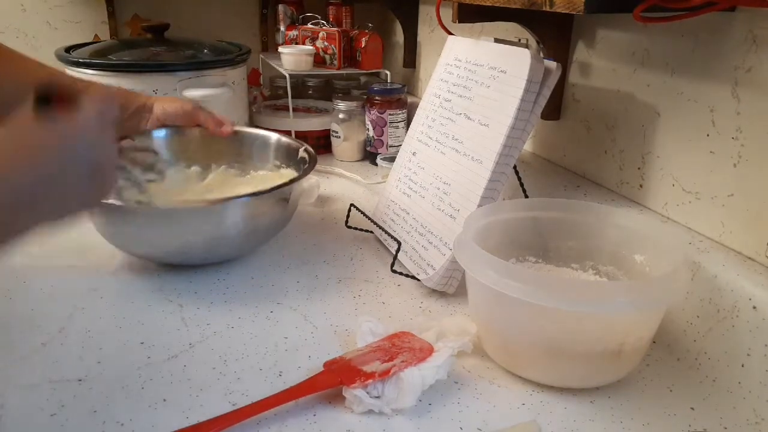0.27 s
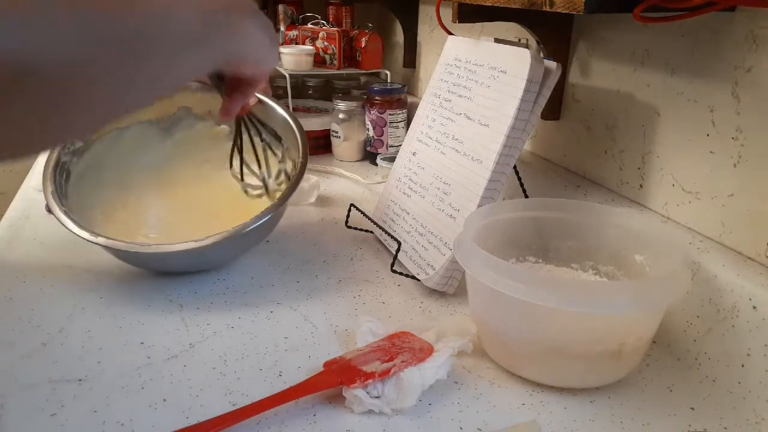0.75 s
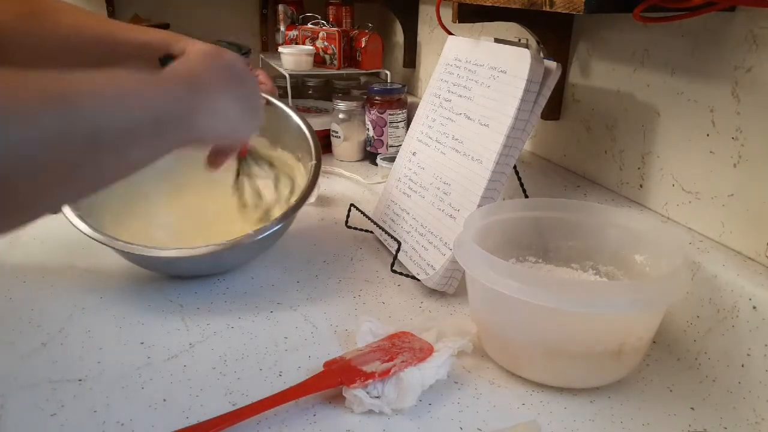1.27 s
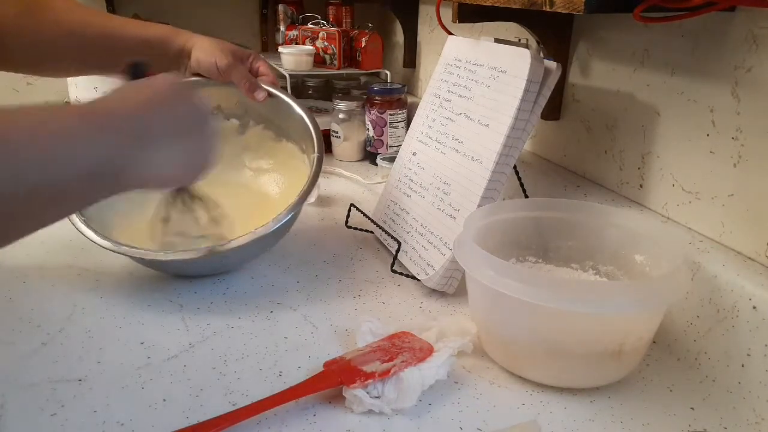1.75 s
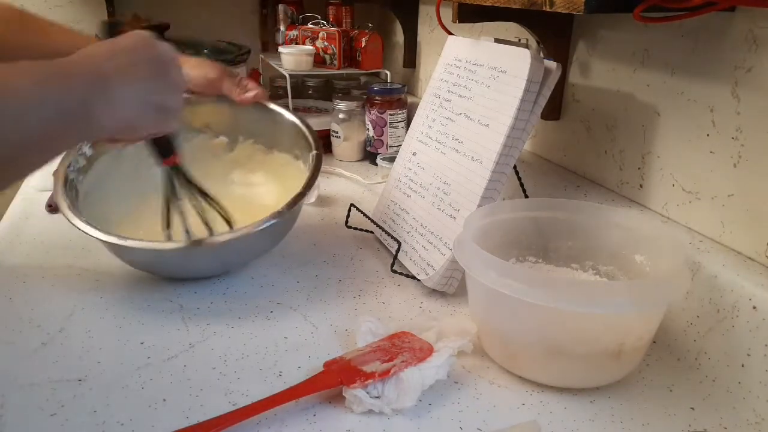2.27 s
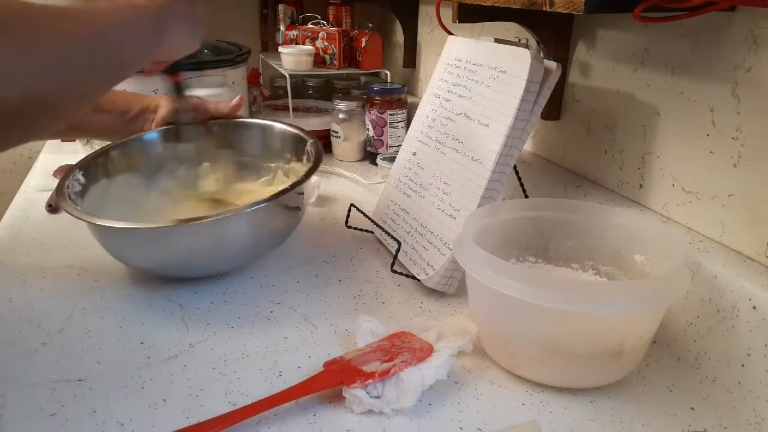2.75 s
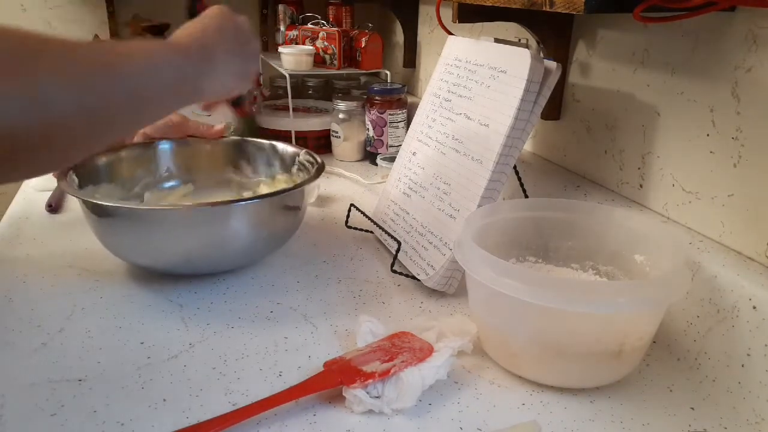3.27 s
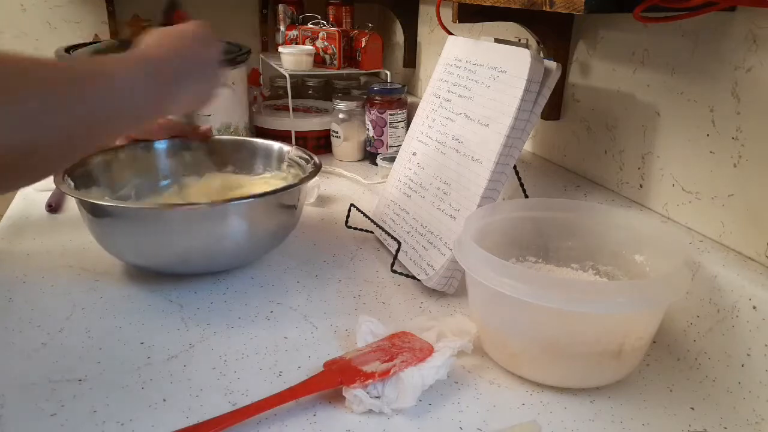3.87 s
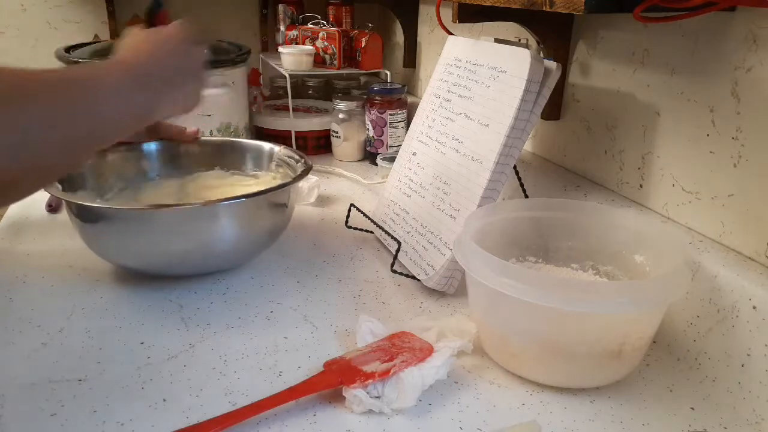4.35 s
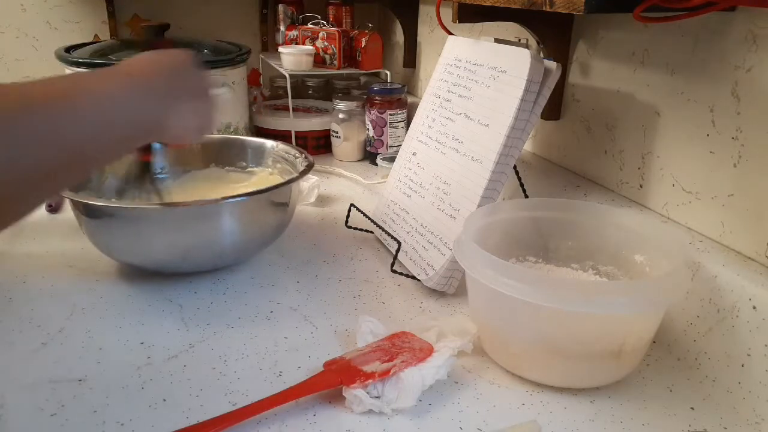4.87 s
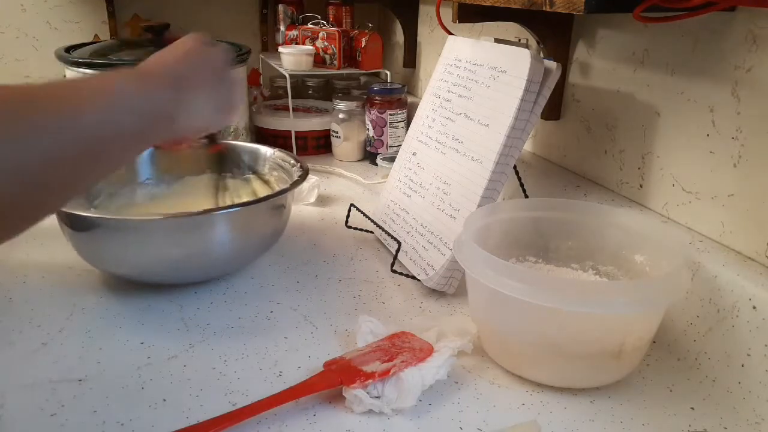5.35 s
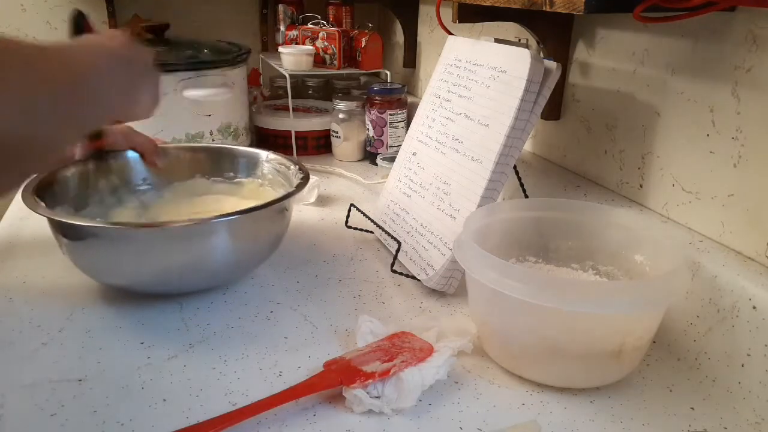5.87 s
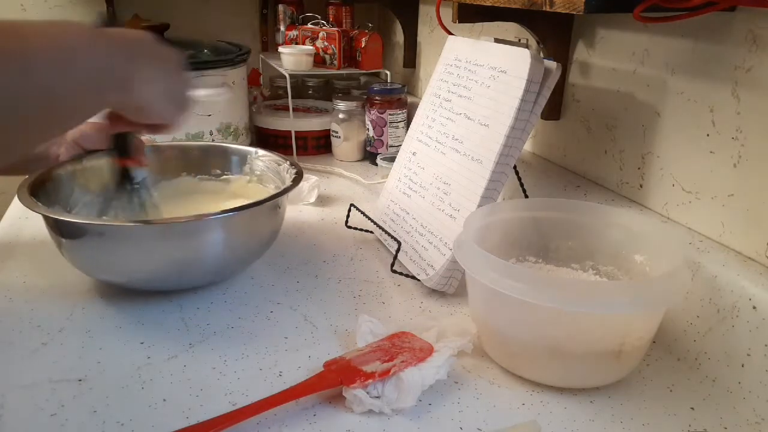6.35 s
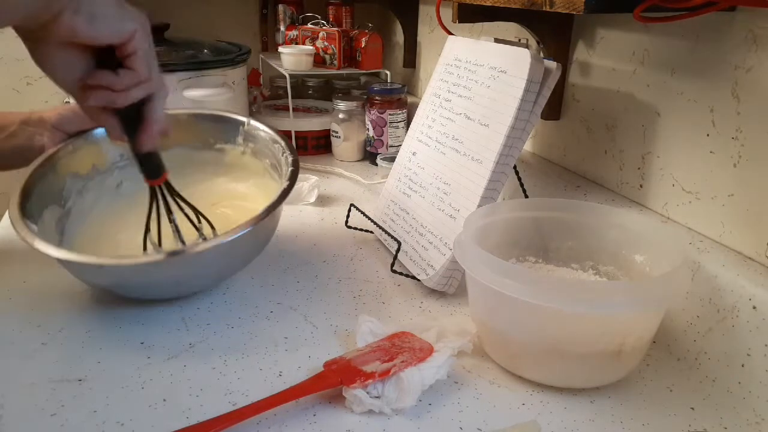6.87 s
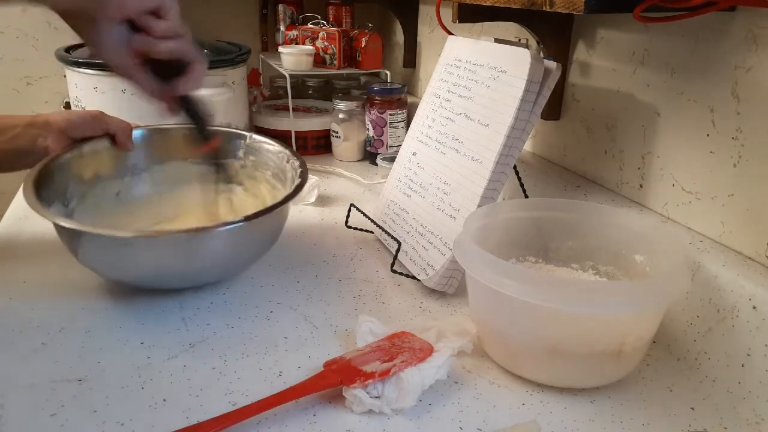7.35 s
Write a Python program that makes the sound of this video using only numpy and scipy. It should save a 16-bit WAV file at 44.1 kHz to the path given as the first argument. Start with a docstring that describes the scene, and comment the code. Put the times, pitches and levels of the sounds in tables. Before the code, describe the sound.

Quick metallic whisking in a steel mixing bowl, bright scrapes and wet batter squelches, the bowl later rocking and thudding against a hollow kitchen counter.

```python
"""A wire whisk beats batter in a steel bowl on a kitchen counter, over quiet room air and an appliance's faint whine.
At first the bowl is tipped up in one hand and rings: random slips scrape the wires, and dying sines make the ring.
Foam and batter are random pops, filtered. Later the bowl is set down flat: it sounds duller and rocks, its foot
knocking and rubbing on the hollow counter. Wet gliding sweeps of noise come from the middle on, among the knocks.
Near the end a very short, high tone burst swells and fades."""
import sys
import numpy as np
from scipy import signal
from scipy.fft import rfft, irfft
from scipy.io import wavfile
from scipy.ndimage import uniform_filter1d

SR = 44100
rng = np.random.default_rng(int(sys.argv[2]) if len(sys.argv) > 2 else 0)


def unload_audio(sound):
    """Save the sound as a 16-bit wav file, at the path given as the first command line argument."""
    columns = np.transpose(np.atleast_2d(sound))
    # keep every value between -1 and 1, then stretch to whole-number steps
    steps = np.round(np.clip(columns, -1, 1) * 32767)
    wavfile.write(sys.argv[1], SR, steps.astype(np.int16))


N = 335601  # length in samples

# How freely the bowl rings, high while tipped up. Each row: time in seconds, freedom in dB.
RING_FREEDOM = [(0, 8), (.8, 7), (1.3, 4), (2.45, 3), (2.9, -5), (4.5, -15), (6.3, -3.5), (6.8, -9.5),
                (7.6, -24.5)]
# Ringing modes of the steel bowl with batter in it; the first six are the deep ones.
# Each row: pitch in Hz, relative level in dB, time in seconds to fall by 60 dB when nothing damps it.
BOWL_MODES = [(450, -17, 0.5), (490, -19.5, 0.43), (618.8, 0.5, 0.13), (633.6, -10, 0.44),
              (740, -14, 0.053), (906, -16, 0.11), (1320, -0.5, 0.26), (1400, -1, 0.33), (1510, 15, 0.053),
              (1600, 11.5, 0.12), (1795, 1, 0.11), (1850, 8, 0.07), (1930, 6.5, 0.046), (2018, 14.5, 0.067),
              (2210, 12.5, 0.066), (2394, 2, 0.066), (2610, 11, 0.21), (3050, 0, 0.11), (3390, -12, .04),
              (4200, -14, .03), (5290, -20, 0.038)]
# Modes of the hollow counter under the loaded bowl; the first is the deep boom.
# Each row: pitch in Hz, relative level in dB, time in seconds to fall by 60 dB.
COUNTER_MODES = [(59.6, -10.5, 0.4), (118.4, -1, 0.26), (141, 5, 0.11), (162.5, -3.5, 0.15),
                 (178.6, 8.5, 0.041), (195.6, -4.5, 0.29), (233, -1, 0.16), (274, -2.5, 0.17),
                 (303, -8.5, 0.17), (366, -3.5, 0.13)]

TURNS_PER_S = 2.9  # average pace of the whisk round the bowl


def from_db(db):
    """Turn decibels into gain."""
    return 10 ** (np.asarray(db) / 20)


def rms_one(x):
    """Scale a sound to an average (rms) level of 1."""
    return x / np.sqrt(np.mean(x ** 2) + 1e-20)


def energy_one(x):
    """Scale each row to a total energy of 1."""
    return x / np.sqrt(np.sum(x ** 2, axis=-1, keepdims=True) + 1e-20)


def fade(t, t60_s):
    """Natural dying away: down by 60 dB after t60_s seconds."""
    return np.exp(-np.log(1000) * t / t60_s)


def in_time(rows):
    """Draw a curve through (seconds, value) rows, one value for every sample."""
    s, value = np.transpose(rows)
    return np.interp(np.arange(N) / SR, s, value)


def add(track, s, sound):
    """Mix a sound into a track at time s."""
    at = int(np.clip(round(s * SR), 0, N - 1))
    track[at:at + len(sound)] += sound[:N - at]


def drift(rate):
    """Slow, smooth random wandering with a spread of 1; a higher rate in Hz wanders faster."""
    step, settle = 40, 2000  # one value per 40 samples; the first 2000 values are thrown away
    r = np.exp(-2 * np.pi * rate * step / SR)
    noise = rng.standard_normal(N // step + settle + 2)
    slow = signal.lfilter([1], [1, -2 * r, r * r], noise)[settle:]
    return np.interp(np.arange(N) / step, np.arange(len(slow)), rms_one(slow))


def through(x, response):
    """Pass a sound through a body or space, given its answer to a single click."""
    return signal.fftconvolve(x, response)[:N]


def resonate(x, hz, r):
    """Ring at one pitch; the closer r is to 1, the longer and narrower the ring."""
    return signal.lfilter([1, 0, -1], [1, -2 * r * np.cos(2 * np.pi * hz / SR), r * r], x)


def colour(x, spectrum, size=4096):
    """Shape the tone by (Hz, dB) rows with a filter of energy 1 that responds at once (minimum phase)."""
    hz, db = np.transpose(spectrum)
    grid = np.arange(size // 2 + 1) * SR / size + 1
    cepstrum = irfft(np.log(from_db(np.interp(np.log(grid), np.log(hz), db))))
    # folding the second half onto the first puts the response after the click
    cepstrum[1:size // 2] *= 2
    cepstrum[size // 2 + 1:] = 0
    return through(x, energy_one(irfft(np.exp(rfft(cepstrum)))))


def blows(modes, vary_db, count, size=18000, lift_db=0):
    """Blows on a body, one per row: a sum of dying sines, with the modes' strengths varied by chance."""
    hz, db, t60_s = np.transpose(modes)[:, :, None]
    t = np.arange(size) / SR
    luck_db = np.clip(vary_db * rng.standard_normal((count, len(modes))), -10, 5)
    rings = np.sin(2 * np.pi * hz * t) * fade(t, t60_s)
    return from_db(db.T + luck_db + lift_db) @ rings


def grains(per_s, spread_db, clump_db, clump_rate):
    """Random clicks of uneven size that come in clumps; rms 1."""
    sizes = from_db(spread_db * np.minimum(rng.exponential(1, N), 4)) * rng.choice([-1, 1], N)
    happens = rng.random(N) < per_s / SR
    return rms_one(sizes * happens * from_db(clump_db * drift(clump_rate)))


def rattle(length_s, first, size=4000):
    """One wire or edge lands, random clicks follow and die away; energy 1."""
    t = np.arange(size) / SR
    happens = rng.random(size) < .15
    clicks = energy_one(rng.standard_normal(size) * happens * np.exp(-t / max(length_s, .0005)))
    clicks[0] += first
    return energy_one(clicks)


def swells(rows, attack_s, sag_db_per_s, release_s):
    """Gain of (start s, length s, dB) pushes: each rises, sags (grows if the sag is negative), then fades."""
    power, t = np.zeros(N), np.arange(2 * SR) / SR
    for s, length_s, db in rows:
        rise = 1 - np.exp(-t / attack_s)
        release = np.exp(-np.maximum(t - length_s, 0) / release_s)
        add(power, s, (from_db(db - sag_db_per_s * t) * rise * release) ** 2)
    return np.sqrt(power + 1e-18)


def places(x, turns_per_s, count):
    """Share a sound among places round the bowl as the whisk circles unevenly; total power is kept."""
    turn = count * (turns_per_s * np.arange(N) / SR + 0.2256 * drift(1.225))
    away = np.abs((turn - np.arange(count)[:, None]) % count - count / 2)
    return x * np.cos(np.pi / 2 * np.minimum(away, 1))


def kitchen(x, near_db, room_db, pan_db, size=14000):
    """Direct sound reaches the left microphone first; bowl, counter and wall scatter it, then the room dies away."""
    near_t60_s, room_t60_s, mic_lag_s = 0.038, 0.29, .00016
    t = np.arange(size) / SR
    echoes = rng.standard_normal((2, size)) * (rng.random((2, size)) < .15)
    near = energy_one(echoes * (t > .0006) * fade(t, near_t60_s))
    room = energy_one(rng.standard_normal((2, size)) * (t > .007) * fade(t, room_t60_s))
    no_bass = signal.butter(2, 450, "high", fs=SR, output="sos")
    scatter = signal.sosfilt(no_bass, from_db(near_db) * near + from_db(room_db) * room)
    # the direct sound
    scatter[0, 0] += 1
    scatter[1, round(mic_lag_s * SR)] += 1
    sides = np.array([through(x, side) for side in energy_one(scatter)])
    return sides * from_db([[pan_db / 2], [-pan_db / 2]])


def background(noise_db):
    """Quiet room air is filtered noise; an appliance adds sines whose phase wavers slightly."""
    # Tone of the room air. Each row: frequency in Hz, relative level in dB.
    air_spectrum = [(18, -12), (30, -26.5), (130, 0), (320, -22), (424, -4), (470, -13.5), (1570, -19.5),
                    (1880, -24), (2140, -27.5), (2630, -17.5), (3070, -29), (12600, -37), (14000, -23)]
    # Appliance tones. Each row: pitch in Hz, rms level in dB ahead of the recorder.
    hum_tones = [(59.5, -73), (415, -81.5), (1394, -88)]
    air = np.array([colour(rng.standard_normal(N), air_spectrum) for side in range(2)])
    t = np.arange(N) / SR
    tones = np.zeros(N)
    for hz, db in hum_tones:
        tones += from_db(db) * np.sqrt(2) * np.sin(2 * np.pi * hz * t + 0.41 * drift(6.3))
    # each side hears a little of the other side's air
    return from_db(noise_db) * (air + 0.12 * air[::-1]) + tones


def whine():
    """The appliance's high whine: a steady tone inside a narrow, fluttering band of noise."""
    # Strength of the whine. Each row: time in seconds, level in dB ahead of the recorder.
    whine_level = [(0, -74.5), (.8, -77.5), (7, -80.5)]
    centre_hz, width_hz = 2560, 150
    edges_hz = [centre_hz - width_hz / 2, centre_hz + width_hz / 2]
    band = signal.butter(2, edges_hz, "band", fs=SR, output="sos")
    flutter = rms_one(signal.sosfilt(band, rng.standard_normal((2, N))))
    tone = np.sin(2 * np.pi * centre_hz * np.arange(N) / SR)
    return from_db(in_time(whine_level)) * rms_one(.5 * flutter + tone)


def effort(wet_share):
    """Gain of the whisk's strokes: each bites at once, eases off as the wrist turns, and fades."""
    # Pushes round the bowl, about two a turn. Each row: start in seconds, length in seconds,
    # level in dB ahead of the layer's own gain, wetness in dB (wet_share of it is added to the level).
    strokes = [(0.064, 0.27, -86, -13), (0.579, 0.11, -66.5, -3), (0.857, 0.13, -53, -24),
               (1.01, 0.31, -58, -18), (1.389, 0.13, -52, -19), (1.527, 0.31, -60, -9),
               (1.648, 0.39, -54, -21), (1.898, 0.067, -45.5, -43), (2.049, 0.043, -50.5, -9.5),
               (2.221, 0.065, -55, -7.5), (2.33, 0.1, -50, -39), (2.465, 0.042, -56, -24),
               (2.621, 0.037, -50.5, -4), (2.665, 0.19, -59, -5), (2.889, 0.11, -54, -1),
               (3.055, 0.34, -57.5, 0.5), (3.252, 0.2, -48.5, -30), (3.46, 0.25, -59, -3.5),
               (3.726, 0.17, -51, 1.5), (3.939, 0.22, -53.5, -1), (4.172, 0.29, -53.5, 2.5),
               (4.47, 0.28, -50.5, -3.5), (4.765, 0.18, -55.5, 0), (4.973, 0.13, -49.5, -7.5),
               (5.064, 0.096, -49.5, 2.5), (5.175, 0.21, -55, -2.5), (5.401, 0.17, -52, -4),
               (5.567, 0.17, -61.5, -3), (5.694, 0.064, -59.5, -3), (5.757, 0.083, -49, -6),
               (5.876, 0.035, -53.5, -7), (5.959, 0.17, -56, -5), (6.114, 0.093, -50.5, -2),
               (6.262, 0.071, -56, -2.5), (6.352, 0.07, -52, 1.5), (6.461, 0.082, -48.5, -11.5),
               (6.507, 0.056, -51, 0.5), (6.56, 0.043, -51.5, 3.5), (6.632, 0.14, -54, -3.5),
               (6.835, 0.061, -58, -6.5), (6.934, 0.13, -75.5, -6), (7.139, 0.073, -73, -4),
               (7.27, 0.1, -66.5, -9), (7.417, 0.22, -67, -11), (7.514, 0.13, -62, 3)]
    rows = [(s, length_s, db + wet_share * wet_db) for s, length_s, db, wet_db in strokes]
    return swells(rows, attack_s=0.0046, sag_db_per_s=12, release_s=0.02)


def wires(ring_db, count, order=22, size=3000):
    """Whisk responses, one per row: bare contact plus the loops' short ring, at other pitches in each; energy 1."""
    low_hz, high_hz, t60_s = 2568, 12085, 0.032
    t = np.arange(size) / SR
    hz = low_hz * (high_hz / low_hz) ** rng.random((count, order, 1))
    loops = np.sin(2 * np.pi * hz * t).sum(axis=1) * fade(t, t60_s)
    response = from_db(ring_db) * energy_one(loops)
    response[:, 0] += 1
    return energy_one(response)


def scratches(per_s, slip_hz, length_s, spread_db, count=900, size=1500):
    """Single wires judder over the steel: short, uneven runs of slips, each at a rate of its own; rms 1."""
    out, t = np.zeros(N), np.arange(size) / SR
    wait, speed, reach, force = rng.random((count, 4)).T
    rate_hz = slip_hz * 4 ** (speed[:, None] - .5)
    # a wire slips each time its uneven progress passes a whole number
    progress = np.cumsum(rate_hz * rng.exponential(1, (count, size)) ** 2 / 2 / SR, axis=1)
    slips = np.diff(np.floor(progress), prepend=-1) * rng.uniform(0.35, 1, (count, size))
    runs = slips * np.exp(-t / (length_s * (.5 + reach[:, None])))
    starts_s = np.cumsum((.5 + wait) / per_s)
    for s, run in zip(starts_s, from_db(spread_db * force[:, None]) * runs):
        if s < N / SR:
            add(out, s, run)
    return rms_one(out)


def scrape(rubbing):
    """Slips ring the wire loops, which change as the whisk presses on other places."""
    # Tone of the scrape. Each row: frequency in Hz, relative level in dB.
    scrape_spectrum = [(300, -21), (1000, -35), (2500, -8), (3500, 6.5), (4500, 6), (5600, 5), (6700, 5),
                       (7600, -1.5), (10000, 3), (14000, -2)]
    pressed = places(rubbing, TURNS_PER_S / 2, count=9)
    ringing = sum(through(x, loop) for x, loop in zip(pressed, wires(ring_db=-1.5, count=9)))
    return from_db(1.5) * colour(ringing, scrape_spectrum)


def foam():
    """Bursting foam is a crackle of very uneven clicks that follows the wetness almost fully."""
    # Tone of the foam. Each row: frequency in Hz, relative level in dB.
    foam_spectrum = [(1000, -66), (4000, -38.5), (6500, -15), (8000, 1), (10000, 0.5), (13000, -7),
                     (15000, 2.5)]
    crackle = grains(per_s=5300, spread_db=15.5, clump_db=2.5, clump_rate=49)
    return from_db(11) * effort(0.97) * colour(crackle, foam_spectrum)


def bubbles(per_s, cycles, spread_db, count=18):
    """Pockets in the batter pop at random pitches and ring for a few cycles; flat spectrum, rms 1."""
    out = np.zeros(N)
    pops = grains(per_s, spread_db, clump_db=3, clump_rate=36.0)
    dealt = rng.integers(0, count, N)  # which pitch each pop gets
    for k, hz in enumerate(np.geomspace(250, 4200, count)):
        r = from_db(-60 * hz / (cycles * SR))  # down by 60 dB after so many cycles
        own_pops = pops * (dealt == k) + 1e-18 * (dealt == 0)  # the tiny part is far too faint to hear
        out += np.sqrt(hz) * rms_one(resonate(own_pops, hz, r))
    return rms_one(out)


def batter():
    """Folding batter squelches as its bubbles pop, more so in wet strokes."""
    # Tone of the batter. Each row: frequency in Hz, relative level in dB.
    batter_spectrum = [(100, -15.5), (270, -16), (380, 4), (480, -2), (630, 3.5), (800, -3.5), (1100, -0.5),
                       (1700, -1.5), (2300, 0), (3200, -5), (6000, -23)]
    squelch = colour(bubbles(per_s=1100, cycles=8.7, spread_db=1.1), batter_spectrum)
    return from_db(6) * effort(0.38) * rms_one(squelch)


def drag(rubbing):
    """The same slips set the whole bowl ringing, louder the more freely it rings."""
    driven = from_db(-6.5 + in_time(RING_FREEDOM)) * rubbing
    bodies = energy_one(blows(BOWL_MODES, vary_db=3.5, count=3))
    return sum(through(x, ring) for x, ring in zip(places(driven, TURNS_PER_S, count=3), bodies))


def sings(waver_hz):
    """A dragging wire makes one mode of the bowl sing: a sine that swells, wavers and rings on."""
    # Each row: start in seconds, length in seconds, average pitch in Hz, level in dB ahead of the room.
    songs = [(0.086, 0.064, 1382, -71), (0.23, 0.066, 1420, -69), (0.558, 0.045, 697, -53),
             (0.594, 0.017, 1863, -45.5), (0.65, .05, 1366, -60), (2.066, 0.039, 1868, -44.5),
             (2.213, 0.052, 2005, -57), (6.52, .03, 3090, -48)]
    waver = waver_hz * drift(23.6)
    out = np.zeros(N)
    for s, length_s, hz, db in songs:
        tone = np.sqrt(2) * np.sin(2 * np.pi * np.cumsum(hz + waver) / SR)
        out += swells([(s, length_s, db)], attack_s=0.008, sag_db_per_s=0, release_s=0.012) * tone
    return out


def taps(push, low_hz, high_hz, count=45):
    """Chance light touches of single wires, levels following the push behind them; rows like hard_strikes."""
    when, spot, loose = rng.random((count, 3)).T
    # one tap at a random moment in each of many equal time slots
    at = ((np.arange(count) + when) / count * (N - 1)).astype(int)
    db = 20 * np.log10(push[at]) + 7 * rng.standard_normal(count)
    tick_hz = low_hz * (high_hz / low_hz) ** spot
    ring_hz = rng.choice(np.array(BOWL_MODES)[6:, 0], count)
    rattle_s = 0.0082 * (.5 + loose)
    return list(zip(at / SR, db + 7.5, tick_hz, db + 4, ring_hz, db + 11.5, rattle_s))


def burst(rise_s, size=500):
    """The snap of a wire: bright noise, a few milliseconds long; energy 1."""
    t = np.arange(size) / SR
    noise = rng.standard_normal(size) * t * np.exp(-t / rise_s)
    return energy_one(signal.lfilter([1, -1], [1, -.6], noise))


def clacks(strikes, tick_db, ring_db, slap_db, width_hz, damping_per_s, snap_db, size=10000):
    """Wires hit the wall: a bright tick, a slap in the batter, and a ring that differs with the spot struck."""
    # Tone of the slap. Each row: frequency in Hz, relative level in dB.
    slap_spectrum = [(100, -49.5), (300, 0.5), (650, 24.5), (1000, 15.5), (1900, 14.5), (2800, 11.5),
                     (5000, 1), (12000, -72.5)]
    spot_db, spot_octaves = 23, 0.068  # how much, and over what span, a spot favours nearby modes
    snap_fade_s = 0.0022  # the rattle length that blurs the snap
    out, slaps = np.zeros((2, N))
    r = np.exp(-np.pi * width_hz / SR)
    count = len(strikes)
    octaves = np.log2(np.array(BOWL_MODES)[6:, 0] / np.array(strikes)[:, 4:5])
    lift_db = spot_db * np.exp(-(octaves / spot_octaves) ** 2)
    walls = blows(BOWL_MODES[6:], vary_db=11.0, count=count, size=size, lift_db=lift_db)
    deeps = blows(BOWL_MODES[:6], vary_db=8.0, count=count, size=size)
    loops = wires(ring_db=-8.5, count=count)
    for strike, wall, deep, loop in zip(strikes, walls, deeps, loops):
        s, db, tick_hz, wall_db, _, deep_db, length_s = strike
        contacts = rattle(length_s, first=0.46)
        free_db = np.interp(s, *np.transpose(RING_FREEDOM))
        # resting on the counter, the bowl loses its ring sooner
        damped = np.exp(-damping_per_s * from_db(-free_db) * np.arange(size) / SR)
        tick = resonate(signal.fftconvolve(contacts, loop), tick_hz, r)
        add(out, s, from_db(db + tick_db) * energy_one(tick))
        # a clean hit with little rattle snaps across the whole treble
        add(out, s, from_db(db + snap_db) * np.exp(-length_s / snap_fade_s) * burst(rise_s=0.00045))
        wall_ring = energy_one(signal.fftconvolve(contacts, wall * damped))
        add(out, s, from_db(wall_db + ring_db + free_db) * wall_ring)
        deep_ring = energy_one(signal.fftconvolve(contacts, deep * damped))
        add(out, s, from_db(deep_db) * deep_ring)
        add(slaps, s, from_db(wall_db + slap_db - free_db / 2) * contacts)
    return out + colour(slaps, slap_spectrum)


def whisk():
    """Wires slip along the steel and ring it, foam bursts, batter folds, and wires clack on the wall."""
    # Hard strikes of the wires on the wall. Each row: time in seconds, tick level in dB, tick centre in Hz,
    # ring level in dB, favoured ring pitch in Hz, deep ring level in dB, rattle length in seconds.
    # All levels are relative; the clacks add their own gains.
    hard_strikes = [(0.095, -69, 2800, -75, 1430, -33.5, 0.022), (0.15, -79, 3000, -75, 1360, -49, 0.025),
                    (0.26, -62, 4500, -62.5, 1410, -49, 0.017), (.5645, -42.5, 3830, -47, 1850, -30, .006),
                    (0.6, -39.5, 5500, -44.5, 1850, -21, 0.0044),
                    (0.863, -29, 4360, -39, 1800, -54, 0.0082), (0.9462, -32, 5440, -40, 1930, -39, 0.036),
                    (1.135, -32.5, 5000, -45.5, 1850, -20, 0.058),
                    (1.2084, -39, 4570, -44, 1510, -25.5, 0.0032),
                    (1.2596, -33.9, 3270, -43.5, 1510, -19.5, 0.0031),
                    (1.3623, -36, 2610, -51, 2450, -40, 0.0042),
                    (1.3962, -21, 3630, -44, 1920, -21, 0.0039),
                    (1.4255, -26, 5700, -34.5, 1970, -10, 0.0056),
                    (1.4858, -28, 5960, -31.5, 1930, -35, 0.0025),
                    (1.725, -20, 6060, -42, 1850, -22, 0.0042),
                    (1.758, -27.5, 5290, -40.5, 1850, -16.5, 0.011),
                    (1.834, -29, 5340, -42, 1370, -35, 0.004), (1.8907, -28, 6040, -40, 1530, -17, 0.082),
                    (2.069, -29.5, 4630, -42, 1850, -39, 0.04),
                    (2.2512, -30.5, 6600, -41.5, 1980, -37, 0.027),
                    (2.393, -26.5, 2740, -58, 1510, -24, 0.0035),
                    (2.477, -29.5, 4400, -44, 1550, -27, 0.003), (2.611, -35, 4750, -43, 2340, -37, 0.0045),
                    (2.9024, -38.5, 3700, -47.5, 1770, -35, 0.0031),
                    (3.076, -30, 3440, -53, 2200, -36, 0.05), (3.1946, -38, 5950, -55, 2300, -24.5, 0.0088),
                    (3.236, -34, 5900, -60, 2550, -29, 0.0022), (3.2694, -36, 4930, -55, 2550, -48, 0.0017),
                    (3.3005, -34, 2540, -43, 2630, -44, 0.0025),
                    (3.3752, -33, 5560, -63, 3200, -48, 0.00098),
                    (3.5593, -36.5, 4480, -36, 2080, -19.5, 0.0033),
                    (3.6181, -45, 5130, -39, 1760, -28, 0.0023),
                    (3.7034, -35, 11400, -39, 1840, -25, 0.0056),
                    (3.7387, -26.5, 9500, -20, 1850, -13.5, 0.0018),
                    (3.7935, -27.5, 2500, -25, 1510, -26, 0.0015),
                    (4.1864, -34, 5500, -28, 1600, -19, 0.0074),
                    (4.336, -36, 7900, -35.5, 1420, -26, 0.00063),
                    (4.488, -36, 8500, -33.5, 1450, -22, 0.0034),
                    (4.583, -34.5, 8500, -33.5, 1480, -29, .005),
                    (4.642, -28, 2870, -25.5, 2270, -22, 0.0087),
                    (4.701, -26, 9400, -26, 1730, -14, 0.0078), (4.777, -33.5, 6930, -28, 1500, -25, 0.011),
                    (4.835, -39, 6000, -31.5, 1470, -24, .006),
                    (4.9214, -37, 2720, -30, 1630, -16.5, 0.0066),
                    (4.981, -29, 9250, -34.5, 1430, -27, 0.0055),
                    (4.996, -49, 8200, -36, 1440, -28, 0.0015),
                    (5.0963, -23.5, 3700, -39, 2620, -33, 0.0033),
                    (5.2095, -31, 8800, -36, 2000, -11.5, 0.0099),
                    (5.3098, -59, 8970, -64, 2220, -41, 0.002),
                    (5.4115, -24.5, 4070, -27.5, 1360, -20, 0.022),
                    (5.558, -44, 3000, -34.5, 1930, -23, 0.021),
                    (5.709, -34, 3780, -43, 1250, -27.5, 0.0026),
                    (5.7812, -37.5, 6160, -37.5, 2610, -27.5, 0.0047),
                    (6.037, -35, 4200, -52, 2000, -35, 0.0027),
                    (6.0764, -28.5, 3340, -36, 1930, -22.5, 0.021),
                    (6.1275, -33.5, 8400, -32.5, 1250, -20, 0.013),
                    (6.1885, -31, 3390, -27, 1710, -27, 0.0018),
                    (6.3665, -32.5, 7500, -41, 2380, -20, 0.0015),
                    (6.456, -34, 4280, -58, 2700, -24, 0.0007),
                    (6.5198, -24, 2730, -24, 3050, -11.5, 0.0025),
                    (6.584, -30.5, 3330, -26, 1765, -23, 0.0012),
                    (6.785, -42, 4470, -38.5, 1380, -30, 0.0023), (7.149, -46, 2470, -42, 2210, -40, 0.018),
                    (7.2875, -41, 4670, -54.5, 1290, -51.5, 0.0032),
                    (7.4106, -34.5, 3600, -43.2, 3160, -34.5, 0.0043),
                    (7.5275, -25.5, 9300, -32.5, 1315, -21, 0.013),
                    (7.539, -30.5, 5600, -33, 1260, -14, 0.002)]
    push = effort(0)
    slips = .8 * grains(per_s=4500, spread_db=3.0, clump_db=2.5, clump_rate=20)
    slips += .6 * scratches(per_s=70, slip_hz=1100, length_s=.008, spread_db=8)
    rubbing = push * slips
    strikes = hard_strikes + taps(push, low_hz=2500, high_hz=9400)
    hits = clacks(strikes, tick_db=17.5, ring_db=22, slap_db=8.0, width_hz=2040, damping_per_s=4, snap_db=27.0)
    wet = foam() + batter() + sweeps(width_hz=670, level_db=1.5)
    return scrape(rubbing) + drag(rubbing) + wet + hits


def knocks(thump_db, clonk_db, crack_db, give_s):
    """The bowl drops back on its foot: the steel clonks, the counter gives way and booms under it."""
    # The foot striking the counter, rebounds included. Each row: time in seconds, thump level in dB,
    # hard clonk level in dB, deep boom level in dB, contact time in seconds. Levels are relative.
    landings = [(0.348, -62, -70, -60, 0.0025), (.564, -73, -40.5, -62, 0.0023),
                (0.604, -71, -39.5, -61, 0.0025), (0.866, -60, -76, -51, 0.0026),
                (1.427, -73, -41, -37, 0.0033), (3.742, -31, -31, -25, 0.0022),
                (3.761, -29, -64, -44, 0.011), (3.793, -32, -29.5, -55, 0.0083),
                (4.049, -26, -25, -42, 0.0026), (4.073, -27.5, -40, -60, 0.0075),
                (4.508, -37, -52, -44, 0.0016), (5.0016, -20.5, -26, -28, 0.00057),
                (5.027, -25.5, -37.5, -45, 0.0039), (5.4615, -17.5, -16.5, -27, 0.00042),
                (5.487, -31, -31, -45, 0.0045), (5.501, -26, -32, -48, 0.004),
                (6.172, -21, -16, -38, 0.0014), (6.188, -27, -33, -43, 0.00098),
                (6.200, -32.5, -47, -44, 0.002), (6.584, -34, -43, -62, 0.0052),
                (7.410, -61, -43, -42, 0.0014)]
    # Modes of the bowl's flat foot. Each row: pitch in Hz, relative level in dB, seconds to fall by 60 dB.
    foot_modes = [(435, -9.5, 0.18), (509, -15, .3), (610, 5.5, 0.046), (656, 1.5, 0.095), (760, -10, 0.19),
                  (850, -8.5, 0.054), (960, -9.5, .08), (1112, -9, 0.089)]
    # Tone of the hard crack. Each row: frequency in Hz, relative level in dB.
    crack_spectrum = [(60, -13), (200, -1), (380, 12.5), (650, 7), (1100, 8), (1600, -8), (3000, -7.5),
                      (8000, -52)]
    thumps, clonks, cracks = np.zeros((3, N))
    bodies = blows(COUNTER_MODES[1:], vary_db=3.5, count=len(landings))
    boom, = blows(COUNTER_MODES[:1], vary_db=0, count=1)
    feet = blows(foot_modes, vary_db=3.0, count=len(landings))
    give = 1 - np.exp(-np.arange(len(boom)) / SR / give_s)
    for (s, db, hard_db, deep_db, contact_s), body, foot in zip(landings, bodies, feet):
        # a softer, longer landing gives a duller thump
        press = np.hanning(int(contact_s * SR) + 3)
        thump = signal.fftconvolve(give * body, press / press.sum())
        add(thumps, s, from_db(db + thump_db) * thump)
        add(thumps, s, from_db(deep_db) * give * boom / boom.max())
        add(clonks, s, -from_db(hard_db + clonk_db) * foot)
        add(cracks, s, from_db(hard_db + crack_db) * rattle(0.011, first=0.63))
    return thumps, clonks + colour(cracks, crack_spectrum)


def shuffle():
    """The foot rubs on the counter: dull noise keeps the counter's modes rumbling, the lowest most of all."""
    # The foot sliding. Each row: start in seconds, length in seconds, level in dB ahead of the rumble's gain.
    slides = [(0.35, 0.05, -64), (0.59, 0.025, -47), (0.87, 0.079, -51.5), (1.17, 0.16, -66),
              (1.42, 0.12, -51.5), (1.9, 0.23, -56.5), (2.22, 0.26, -67), (2.8, 0.13, -56),
              (3.37, 0.77, -58), (3.7, 0.058, -43.5), (3.745, 0.14, -38.5), (4.0, 0.62, -56.5),
              (4.5, 0.11, -44.5), (4.88, 1.06, -55), (6.3, 0.41, -49.5), (6.85, 0.37, -61),
              (7.33, 0.33, -55.5)]
    sliding = swells(slides, attack_s=0.007, sag_db_per_s=-3, release_s=0.066)
    rub = signal.lfilter(*signal.butter(1, 70, fs=SR), rng.standard_normal(N))
    lowest, = blows(COUNTER_MODES[:1], vary_db=-7.0, count=1)
    higher, = blows(COUNTER_MODES[1:], vary_db=-7.0, count=1)
    rumble = rms_one(through(rub, lowest) + from_db(-27) * through(rub, higher))
    # evens out the rumble's own ups and downs
    steady = rumble / np.sqrt(uniform_filter1d(rumble ** 2, size=2000) + 0.0011)
    return from_db(4) * sliding * steady


def sweeps(width_hz, level_db):
    """An air pocket changes size behind the wires: a narrow band of noise whose pitch glides."""
    # Each row: start in seconds, length in seconds, start pitch in Hz, end pitch in Hz, relative level in dB.
    glides = [(3.408, 0.12, 2350, 2000, -51.5), (4.209, 0.13, 1011, 1461, -48),
              (4.687, 0.11, 2357, 1264, -50), (4.752, .06, 1202, 1632, -42.5),
              (4.818, 0.049, 1110, 1534, -48), (5.085, 0.039, 1410, 2140, -48),
              (5.765, 0.11, 2426, 1874, -51.5), (6.102, 0.054, 2500, 1663, -47),
              (6.669, 0.12, 1483, 963, -52.5)]
    out = np.zeros(N)
    low_pass = signal.butter(2, width_hz / 2, fs=SR, output="sos")
    for s, length_s, start_hz, end_hz, db in glides:
        hz = np.geomspace(start_hz, end_hz, int(length_s * SR))
        wobble = signal.sosfilt(low_pass, [1, 1j] @ rng.standard_normal((2, N // 20)))
        # slow complex noise is shifted up to the gliding pitch
        pocket = np.resize(wobble, len(hz)) * np.exp(2j * np.pi * np.cumsum(hz) / SR)
        swell = np.sin(np.linspace(0, np.pi, len(hz)))
        add(out, s, from_db(db + level_db) * rms_one(pocket.real) * swell)
    return out


def tone_burst():
    """A very short, high tone burst: a sine that swells and fades within a few milliseconds."""
    at_s, hz, width_s, level_db = 7.5392, 3740, 0.0009, -20.5
    t = np.arange(N) / SR - at_s
    return from_db(level_db) * np.exp(-(t / width_s) ** 2) * np.sin(2 * np.pi * hz * t)


def scene():
    """Whisk, bowl and counter in the kitchen; the reflections change as the whisk goes round."""
    around = places(whisk(), TURNS_PER_S, count=11)
    beating = sum(kitchen(x, near_db=2.5, room_db=-1.5, pan_db=1.2) for x in around)
    thumps, clonks = knocks(thump_db=-3.0, clonk_db=-10.5, crack_db=18.0, give_s=0.0035)
    bright = kitchen(clonks + tone_burst() + sings(waver_hz=16), near_db=-3, room_db=-10, pan_db=5.5)
    counter = kitchen(thumps + shuffle(), near_db=-6.5, room_db=-2.5, pan_db=0)
    bowl_and_counter = from_db(-0.5) * beating + bright + from_db(1.0) * counter
    return bowl_and_counter + background(noise_db=-70.5) + whine()


def record(dry):
    """The recorder drops the deepest bass and cuts the top steeply."""
    bass_cut = signal.butter(4, 48, "high", fs=SR, output="sos")
    top_cut = signal.ellip(10, .2, 75, 13150, fs=SR, output="sos")
    return signal.sosfilt(top_cut, signal.sosfilt(bass_cut, dry))


dry = scene()
out = record(dry)
unload_audio(out)
```